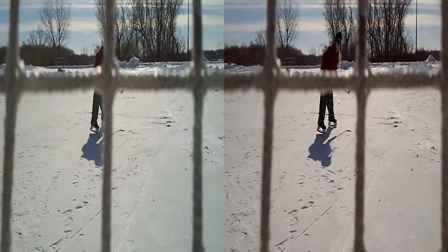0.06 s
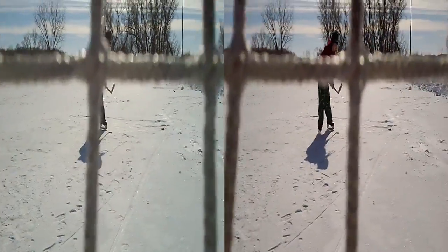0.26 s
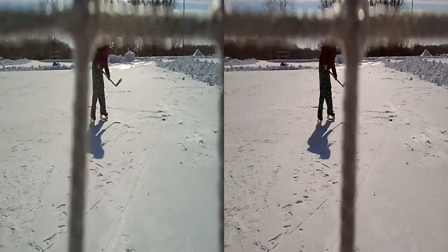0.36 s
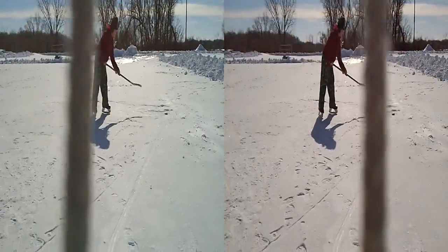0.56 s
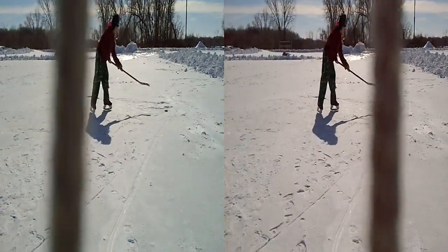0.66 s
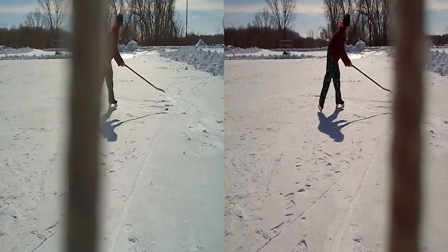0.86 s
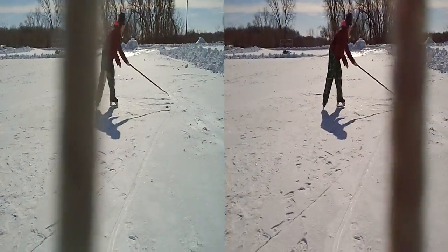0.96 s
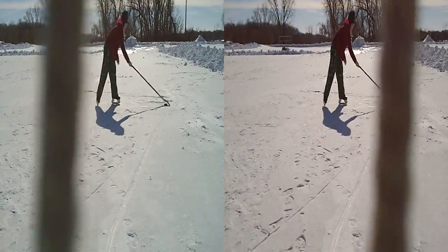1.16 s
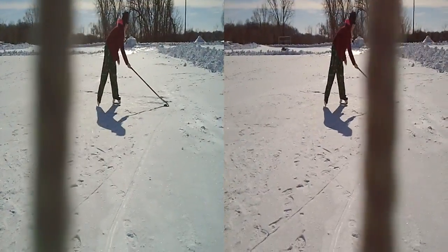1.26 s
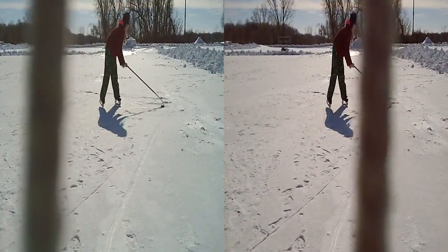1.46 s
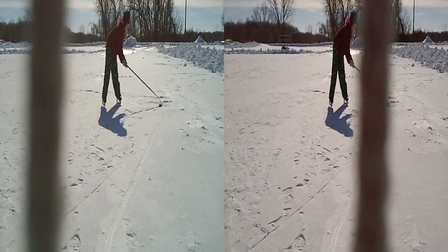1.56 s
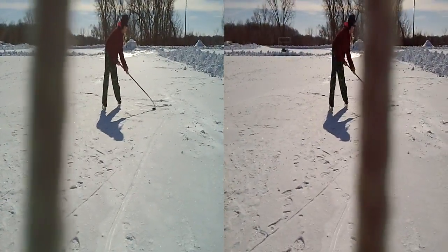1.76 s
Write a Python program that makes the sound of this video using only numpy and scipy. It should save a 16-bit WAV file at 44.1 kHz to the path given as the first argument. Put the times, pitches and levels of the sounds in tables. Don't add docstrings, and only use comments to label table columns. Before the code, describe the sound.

A puck slams a steel mesh fence up close, a sharp overloaded crack with ringing metal

```python
import sys
import numpy as np
from scipy import signal
from scipy.fft import rfft, irfft, next_fast_len
from scipy.io import wavfile
from scipy.ndimage import uniform_filter1d, map_coordinates

SR = 44100
rng = np.random.default_rng(int(sys.argv[2]) if len(sys.argv) > 2 else 0)


def digitize_waveform(pressure):
    field = np.atleast_2d(pressure).T
    bounded = np.clip(field, -1, 1)
    quanta = np.round(bounded * 32767).astype(np.int16)
    wavfile.write(sys.argv[1], SR, quanta)


def attenuation_scalar(level_db):
    decades = np.asarray(level_db, float) / 20
    return 10 ** decades


N = 79380
HIT_S = .1822
RISE_S, HOLD_S = .0012, .003


def unit(x):
    return x / np.sqrt(np.mean(x ** 2) + 1e-20)


def along(points, hz):
    f, v = np.transpose(points)
    return np.interp(np.log(hz + 1), np.log(f + 1), v)


def filtered(x, response):
    n = x.shape[-1]
    m = next_fast_len(n + 8192)
    return irfft(rfft(x, m) * response(np.fft.rfftfreq(m, 1 / SR)), m)[..., :n]


def resonances(peaks):
    def response(f):
        total = 0
        for k, (centre, width, db) in enumerate(peaks):
            damping = 1j * f * width
            total = total + (-1) ** k * attenuation_scalar(db) * damping / (centre * centre - f * f + damping)
        return total
    return response


def wobble(rate):
    knots = rng.standard_normal(int(N * rate / SR) + 4)
    return map_coordinates(knots, [np.arange(N) * rate / SR])


def pair(noise, spectrum, alike):
    def mid_side(hz):
        turn = np.arccos(np.clip(along(alike, hz), -1, 1)) / 2
        return attenuation_scalar(along(spectrum, hz)) * [np.cos(turn), np.sin(turn)]
    mid, side = filtered(noise, mid_side)
    return unit(np.array([mid + side, mid - side]))


def level(rows):
    s, db = np.transpose(rows)
    return attenuation_scalar(np.interp(np.arange(N) / SR, s, db, left=-120, right=-120))


def gritty(grit_db, patchy_db):
    z = signal.stft(rng.standard_normal((2, N)), nperseg=256)[2]
    field = uniform_filter1d(rng.standard_normal(z.shape[1:]), size=4, axis=0)
    field = uniform_filter1d(field, size=25, axis=1)
    noise = signal.istft(z * attenuation_scalar(patchy_db * unit(field)), nperseg=256)[1][:, :N]
    grains = attenuation_scalar(grit_db * wobble(700) + .4 * grit_db * wobble(80))
    return unit(grains) * noise


# (f/Hz, left-right likeness)
BLOW_LIKENESS = [(300, 1), (1500, 0.96), (3000, .7), (5000, 0.0082), (12000, 0.029)]


def dying(spectrum, t60s, hold_s):
    t = np.arange(SR // 2) / SR
    noise = pair(rng.standard_normal((2, len(t))), spectrum, BLOW_LIKENESS)
    centres = np.geomspace(250, 16000, num=7)
    total = 0
    for k, centre in enumerate(centres):
        weights = list(zip(centres, np.arange(len(centres)) == k))
        band = filtered(noise, lambda f: along(weights, f))
        total = total + band * attenuation_scalar(-60 * np.maximum(t - hold_s, 0) / along(t60s, centre))
    return total


# (f/Hz, level/dB)
CRACK_TONE = [(35, -59), (60, -38.5), (1230, 4), (2720, -5.5), (5100, -5), (7410, -15.5), (9790, 1),
              (11800, -2.5), (15600, -22.5)]
# (f/Hz, t60/s)
CRACK_DECAY = [(300, 0.058), (2000, 0.044), (10000, 0.058)]
# (f/Hz, width/Hz, level/dB)
MESH_WIRES = [(3220, 260, -4.5), (3840, 90, -2.5), (5340, 290, 2.5), (5820, 67, -5), (9560, 340, -8),
              (9840, 97, -1.5), (10800, 110, -11), (11800, 120, -8.5)]
# (f/Hz, level/dB)
RATTLE_TONE = [(120, -78), (200, -46), (654, -27.5), (1510, -32.5), (1810, -3), (2220, -21), (5130, -21.5),
               (9710, -23.5), (15600, -35)]
# (f/Hz, t60/s)
RATTLE_DECAY = [(500, 0.26), (3000, 0.18), (12000, 0.18)]
# (f/Hz, level/dB)
SLAP_TONE = [(300, -42), (1500, -13), (4000, -8.5), (7000, -15), (10000, -0.5), (12000, -3), (16000, -24)]
# (f/Hz, left over right/dB)
BLOW_BALANCE = [(60, -10.5), (110, -4), (200, 1), (380, -4), (700, 4), (1290, -4.5), (2380, -0.5),
                (4400, 1), (8120, 5.5), (15000, -6)]


def puck_blow():
    t = np.arange(SR // 2) / SR
    rise = np.minimum(t / RISE_S, 1) ** 2
    crack = attenuation_scalar(-14) * rise * dying(CRACK_TONE, CRACK_DECAY, RISE_S + HOLD_S)
    wires = attenuation_scalar(-1) * filtered(rise * dying([(100, 0)], CRACK_DECAY, RISE_S), resonances(MESH_WIRES))
    rattle = attenuation_scalar(-25 + 0.42 * wobble(250)[:len(t)]) * rise * dying(RATTLE_TONE, RATTLE_DECAY, 0)
    slap_s, slap_t60 = .0017, .006
    slap_hold_s = np.array([[.0034], [.0022]])
    slap = (t > slap_s) * attenuation_scalar(-4 - 60 * np.maximum(t - slap_s - slap_hold_s, 0) / slap_t60)
    slap = slap * pair(rng.standard_normal((2, len(t))), SLAP_TONE, BLOW_LIKENESS)
    blow = filtered(crack + wires + rattle + slap,
                    lambda hz: attenuation_scalar(along(BLOW_BALANCE, hz) * [[.5], [-.5]]))
    out = np.zeros((2, N))
    out[:, round(HIT_S * SR):][:, :len(t)] = (rise > 0) * blow
    return out


# (f/Hz, level/dB, t60/s, delay/s)
LONG_RING = [
    (1767.5, -41.5, 2.85, .000142),
    (1858.4, -32, 1.5, .000197),
]
# (f/Hz, level/dB, t60/s, delay/s)
FRAME_MODES = [(1806, -52.5, 1.2, 0.002), (1910, -38, 0.24, 0.012), (2019, -44.5, 0.87, 0.0037),
               (499, -26, .06, 0.0034), (685, -54, .55, 0.0038), (935, -20.5, 0.044, 0),
               (1166.5, -18, 0.052, 0), (1350, -21, 0.036, 0.0012), (3900, -46.5, 0.5, 0.0016),
               (5070, -35, .3, 0), (5290, -27, 0.15, 0.00099), (9800, -21.5, .12, 0.0023)]


def frame_ring():
    u = np.maximum(np.arange(N) / SR - HIT_S, 0)
    lead_s = .00004 * np.array([[.5], [-.5]])
    ring = np.zeros((2, N))
    for hz, db, t60, late in LONG_RING + FRAME_MODES:
        decay = attenuation_scalar(db - 60 * u / t60 * (1 + (u / 1.15) ** 2))
        tone = decay * np.sin(2 * np.pi * hz * (u - late + lead_s))
        if 600 < hz < 800 or hz > 3000:
            tone = tone * np.array([wobble(0.066 * hz), wobble(0.066 * hz)])
        ring += tone
    return ring * (1 - np.exp(-u / 0.00052))


# (f/Hz, left-right likeness)
ICE_LIKENESS = [(500, 0.99), (1500, 1), (3200, 1), (4800, 0.55), (7000, .88), (9500, 0.73), (13000, 0.14)]


def chip(hz, octaves, length):
    tone = [(hz / 8, -26 / octaves), (hz / 2, -8 / octaves), (hz, 0),
            (hz * 2, -8 / octaves), (hz * 8, -40 / octaves)]
    noise = pair(rng.standard_normal((2, length)), tone, ICE_LIKENESS)
    low_hz = min(250, hz / 2)
    return filtered(noise, lambda f: 1 / (1 + (low_hz / (f + 1)) ** 4))


# (t/s, peak level/dB, f/Hz, t60/s, width/octaves)
ICE_TICKS = [(.002, -20.5, 8700, 0.016, 0.7), (.007, -26.5, 9500, 0.017, .7), (.008, -34, 606, 0.021, 0.77),
             (0.053, -41, 675, 0.033, 0.98), (0.1611, -29.5, 12440, 0.014, 0.34),
             (.190, -16, 10000, 0.024, 0.39), (0.1939, -17, 2200, 0.013, 0.85),
             (0.259, -43, 7000, .04, 1.7), (.385, -48, 9500, .08, .8), (0.5292, -41.5, 3000, 0.063, 4.1),
             (.534, -41.5, 1680, 0.049, 0.33), (.572, -47, 11500, 0.035, 0.51),
             (.745, -49, 7200, 0.036, 2.2), (0.7511, -38, 5000, 0.013, 2),
             (0.753, -19.5, 7550, 0.0056, 1.6), (.757, -35.5, 8940, .008, 1.8), (.814, -53, 10000, .015, 1),
             (0.966, -45, 3000, 0.027, 2.6), (0.9778, -32.5, 4170, 0.039, 1.4),
             (1.2642, -37, 9000, 0.011, 3.1), (1.4481, -41, 2490, 0.036, 2.8),
             (1.5232, -35.5, 5000, 0.014, 3), (1.534, -32, 9000, .008, 2.5),
             (1.5583, -40.5, 6060, .008, 3.3), (1.5663, -37.5, 7000, 0.016, 3.3)]
# (middle t/s, peak level/dB, f/Hz, half length/s, width/octaves)
ICE_CRUNCHES = [(.451, -47, 10500, .012, 2), (0.661, -55.5, 11130, .02, 0.51),
                (.718, -45, 10380, .016, 3.1), (.83, -50, 11000, .014, 0.83),
                (0.926, -44.5, 11470, .012, 0.4), (0.946, -55.5, 393, 0.033, 1.4),
                (1.012, -41.5, 4000, 0.045, 0.58), (1.371, -44.5, 1520, .024, 1.5),
                (0.429, -56, 4000, .015, 2), (1.406, -50, 1190, .012, 1.5), (1.433, -44, 10200, .01, .6),
                (1.475, -48, 6000, 0.011, 2.45), (1.495, -49, 3970, 0.015, 3.3),
                (1.548, -43, 8070, .008, 0.43)]


def ticks():
    out, t = np.zeros((2, N + SR)), np.arange(SR // 8) / SR
    for s, db, hz, t60, octaves in ICE_TICKS:
        envelope = attenuation_scalar(db - 4.5 - 60 * t / t60) * (1 - np.exp(-t / 0.00048))
        out[:, round(s * SR):][:, :len(t)] += envelope * chip(hz, octaves, len(t))
    for s, db, hz, length, octaves in ICE_CRUNCHES:
        swell = np.sin(np.pi * np.minimum(t / (2 * length), 1)) ** 4
        out[:, round((s - length) * SR):][:, :len(t)] += attenuation_scalar(db - 5) * swell * chip(hz, octaves, len(t))
    return out[:, :N]


# (t/s, extra delay/s, gain)
ICE_ECHO = [(1.095, .000112, 0), (1.125, .000105, .7), (1.15, .00009, .6), (1.18, .000082, 0)]


def mirrored(x):
    n = np.arange(N)
    s, delay_s, gain = np.transpose(ICE_ECHO)
    late = n - SR * np.interp(n / SR, s, delay_s)
    echo = np.array([map_coordinates(c, [late]) for c in x])
    return x + np.interp(n / SR, s, gain) * echo


# (t/s, level/dB)
SCRAPE_LEVEL = [(.935, -71.5), (.968, -52), (1.01, -44.5), (1.07, -47), (1.12, -52.5), (1.258, -52.5),
                (1.266, -57), (1.279, -62.5), (1.284, -51), (1.36, -50.5), (1.5, -54), (1.515, -58.5),
                (1.565, -54), (1.58, -66)]
# (f/Hz, level/dB)
RUB_TONE = [(100, -53), (350, -20), (757, -15), (1880, -11.5), (3600, -10.5), (13000, -12.5), (14000, -18),
            (15600, -17.5)]
# (f/Hz, width/Hz, level/dB)
STICK_MODES = [(544, 135, 0), (1140, 110, -1), (1863, 170, 2), (2390, 110, -3), (2710, 110, -1.5),
               (3700, 150, -4), (4573, 340, -6.5), (9340, 1200, -4.5), (12400, 700, -5)]


def stick_scrape():
    rub = pair(gritty(grit_db=1.68, patchy_db=1.46), RUB_TONE, ICE_LIKENESS)
    shaft = resonances(STICK_MODES)
    scrape = filtered(mirrored(rub), lambda f: 1 + attenuation_scalar(10.5) * np.abs(shaft(f)))
    return level(SCRAPE_LEVEL) * unit(scrape)


# (t/s, level/dB)
GLIDE_LEVEL = [
    (0, -41),
    (.024, -50.5),
    (.06, -47.5),
    (.108, -44),
    (.15, -49.5),
    (.163, -50),
    (.175, -52.5),
]
# (f/Hz, level/dB)
GLIDE_COLOUR = [(120, -54), (200, -22), (555, -6), (925, -13), (4350, -9), (4950, -22), (7120, -8),
                (12300, -9.5), (15600, -22)]
# (t/s, level/dB)
SHUFFLE_LEVEL = [(.27, -68), (.345, -58.5), (.358, -85), (.384, -97), (.39, -61), (.47, -64), (.495, -67.5),
                 (.503, -94), (.64, -99), (.68, -78.5), (.95, -69.5)]
# (f/Hz, level/dB)
SHUFFLE_COLOUR = [(1470, -45), (2500, -8.5), (3780, -8), (6270, -7.5), (9400, -5), (15600, -10)]


def skates():
    glide = level(GLIDE_LEVEL) * pair(gritty(grit_db=3, patchy_db=1.0), GLIDE_COLOUR, ICE_LIKENESS)
    shuffle = pair(gritty(grit_db=4.0, patchy_db=1.5), SHUFFLE_COLOUR, ICE_LIKENESS)
    return glide + level(SHUFFLE_LEVEL) * attenuation_scalar(3.6 * wobble(21)) * shuffle


# (t/s, peak level/dB, f/Hz, t60/s)
DULL_KNOCKS = [
    (.098, -46, 550, 0.11),
    (.5725, -48, 525, 0.021),
    (.8155, -51.5, 550, 0.032),
    (.535, -52, 2370, 0.12),
]


def knocks():
    s, db, hz, t60 = np.transpose(DULL_KNOCKS)[:, :, None]
    u = np.maximum(np.arange(N) / SR - s, 0)
    tones = attenuation_scalar(db - 60 * u / t60) * (1 - np.exp(-u * hz)) * np.sin(2 * np.pi * hz * u)
    return tones.sum(axis=0)


# (f/Hz, level/dB)
AIR_TONE = [(15, -41), (25, -10.5), (724, -5), (785, -11), (1060, -7), (3640, -12), (5760, -14), (8620, -9),
            (15600, -16)]
# (f/Hz, left-right likeness)
AIR_LIKENESS = [(50, 0.66), (500, .85), (2200, 0.78), (5000, 0.29), (10000, 0.14)]


def air():
    u = np.arange(N) / SR - HIT_S
    duck_db = -9 * (u > -.015) * np.exp(-(np.maximum(u, 0) / 0.24) ** 2)
    hush = pair(gritty(grit_db=1.5, patchy_db=2.0), AIR_TONE, AIR_LIKENESS)
    wind_duck_db = -12 * (u > 0) * np.exp(-(u / .17) ** 4)
    wind_tone = [(20, -3.0), (50, -3.5), (120, -2.5), (300, -41.0)]  # (f/Hz, level/dB)
    wind = pair(rng.standard_normal((2, N)), wind_tone, AIR_LIKENESS)
    wind = attenuation_scalar(-27 + 4 * wobble(14) + wind_duck_db) * wind
    return attenuation_scalar(-62.5 + duck_db) * (hush + wind)


def scene():
    fence = puck_blow() + frame_ring()
    on_ice = ticks() + stick_scrape() + skates() + knocks()
    return fence + on_ice + air()


def top_cut(x):
    return signal.sosfilt(signal.butter(12, 15740, fs=SR, output="sos"), x)


def record(dry):
    top, knee = 0.91, 6
    clipped = dry / (1 + np.abs(dry / top) ** knee) ** (1 / knee)
    loud = uniform_filter1d(1. * (np.abs(dry) > .3), size=900) > 0
    bass = filtered(clipped * loud, lambda hz: 1 / (1 + (hz / 122) ** 2))
    mix = filtered(clipped - bass * loud, lambda hz: 1 / (1 + (hz / 15500) ** 80))
    return top_cut(mix)


dry = scene()
out = record(dry)
digitize_waveform(out)
```